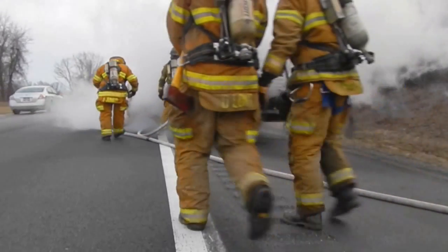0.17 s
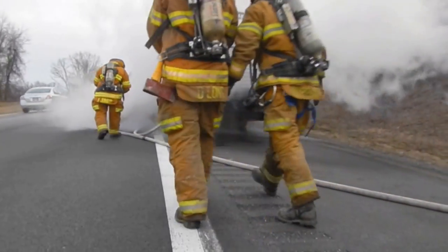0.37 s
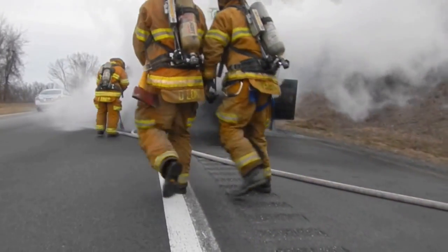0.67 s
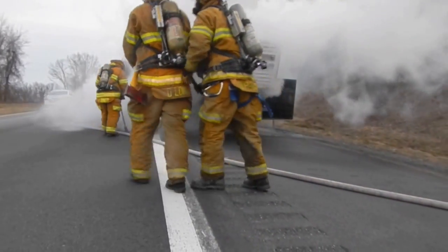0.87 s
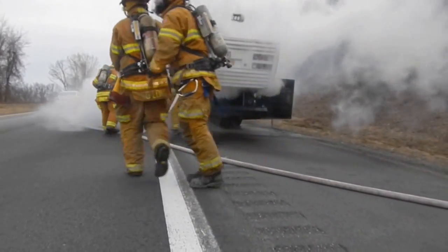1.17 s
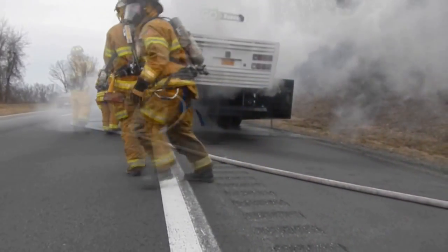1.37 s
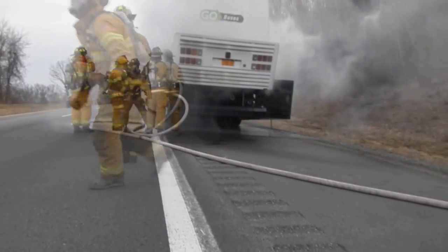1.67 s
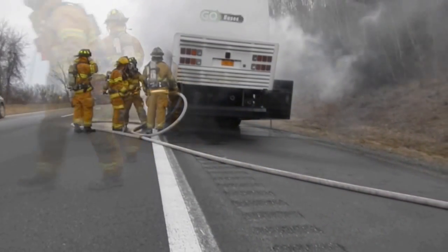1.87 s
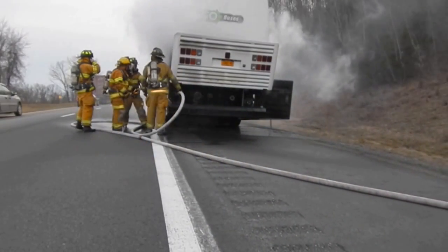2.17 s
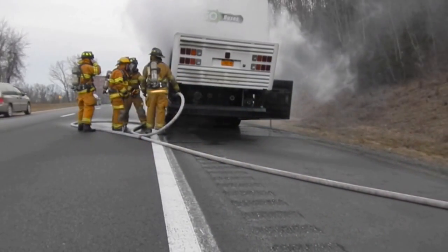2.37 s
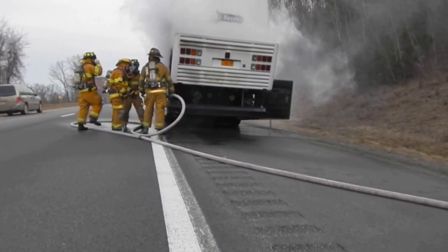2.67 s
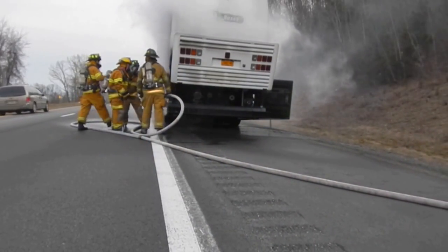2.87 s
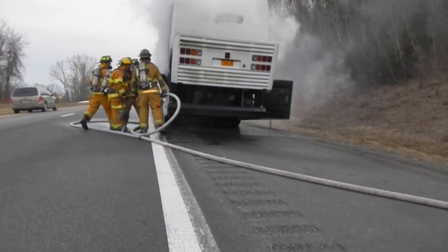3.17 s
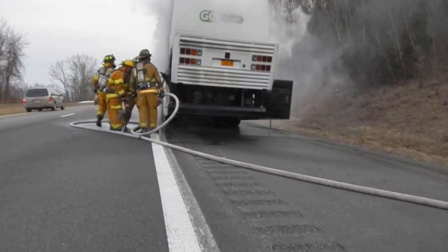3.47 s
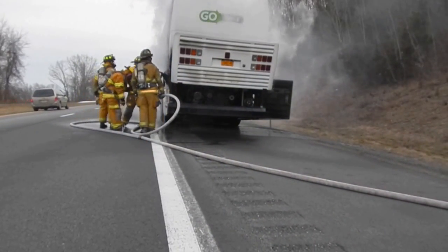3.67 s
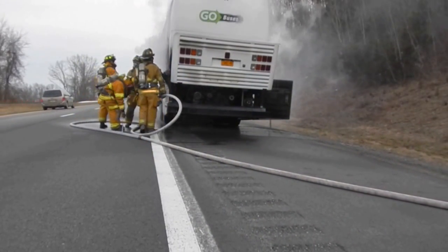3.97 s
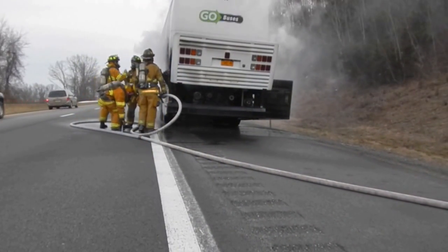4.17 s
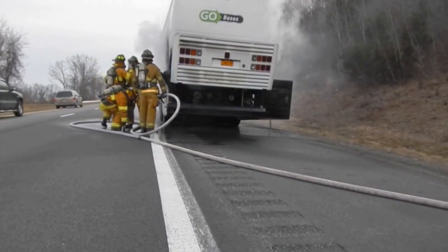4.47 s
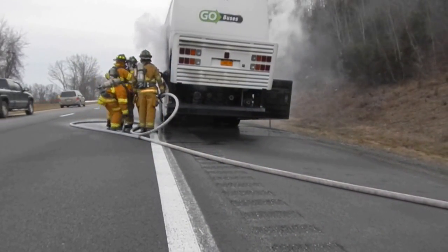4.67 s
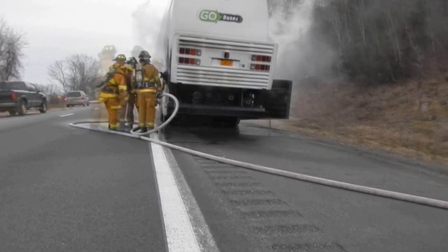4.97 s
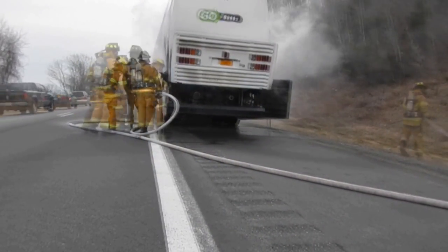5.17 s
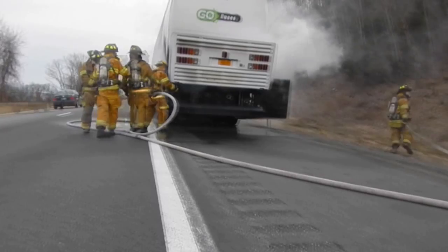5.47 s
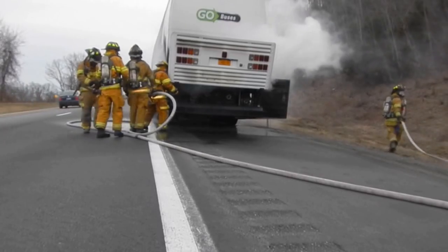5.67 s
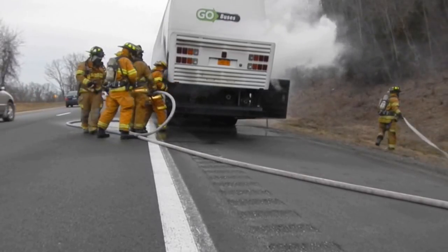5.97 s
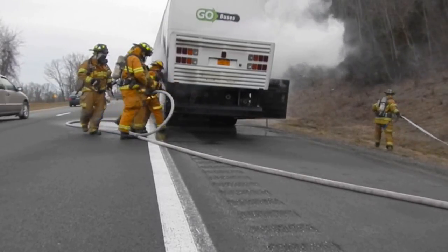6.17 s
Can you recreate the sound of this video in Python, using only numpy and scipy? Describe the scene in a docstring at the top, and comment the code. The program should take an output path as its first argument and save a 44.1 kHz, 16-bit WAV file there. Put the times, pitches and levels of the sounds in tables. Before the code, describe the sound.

Close, loud fire engine diesel running steadily, rattling knocks and whining pump gears, its level repeatedly dipping abruptly and creeping back.

```python
"""A big diesel drones at pumping speed on a roadside, close to a small stereo microphone.
Firing orders are sines locked to the shaft, over noise roar that partly repeats each engine cycle.
Knocks ring short modes, pump gears whine, a thin whistle sits on top, and a small metal tick rings once.
A boomy 300 Hz drone of resonant noise comes from the right. Two cross-fades join three moments.
The whole level drops in steps, each after a short surge, and creeps back up."""
import sys
import numpy as np
from scipy import signal
from scipy.fft import rfft, irfft
from scipy.io import wavfile
from scipy.ndimage import uniform_filter1d, minimum_filter1d

SR = 44100
rng = np.random.default_rng(int(sys.argv[2]) if len(sys.argv) > 2 else 0)


def invert_db(x):
    """Field ratio 10**(x/20) for x, a level in decibels (scalar or array-like)."""
    u = np.asarray(x, float) / 20
    return 10 ** u


def master_out(mix):
    """Clip the mix to full scale and print it as 16-bit PCM to the path in sys.argv[1]."""
    frames = np.transpose(np.atleast_2d(mix))
    ceiling = np.clip(frames, -1, 1)
    pcm = np.round(ceiling * 32767).astype(np.int16)
    wavfile.write(sys.argv[1], SR, pcm)


N = 278271
T = np.arange(N) / SR
HZ = np.fft.rfftfreq(N, 1 / SR)

# engine speed as the pitch of the pump gears, with the base level of their whine:
# (time [s], pitch [Hz], level [dB])
GEAR_WHINE = [(0, 2092, -41), (.3, 2093.3, -39.5), (.9, 2093, -36), (1.3, 2092, -39.5), (1.6, 2090.5, -35),
              (1.9, 2086.5, -35.5), (2.35, 2088, -36), (2.75, 2085.3, -41), (3.0, 2086.2, -35),
              (3.3, 2085, -38), (3.8, 2090, -34), (4.3, 2087.6, -37), (4.85, 2086.4, -36.5),
              (5.2, 2088.7, -37), (5.7, 2089.5, -42), (6.31, 2086.5, -42.5)]
# the three moments: (fade-in start [s], level [dB], whistle pitch at that start [Hz], whistle glide [Hz/s])
MOMENT_ROWS = [(-1, .8, 6690, -17), (1.47, 0, 6568, -1), (5.1, -.3, 6572, -8)]
GEAR_PER_TURN = 63.47  # gear contacts per shaft turn
CYCLE = 2680  # samples in one engine cycle of two shaft turns, as the noise repeats


def curve(table, k):
    """Column k of a table over time."""
    rows = np.array(table, float)
    return np.interp(T, rows[:, 0], rows[:, k])


def spectrum(table, k):
    """Column k of a table over log frequency."""
    rows = np.array(table, float)
    return np.interp(np.log(HZ + 1), np.log(rows[:, 0]), rows[:, k])


def bump(hz, width):
    """Steep resonance shape: 1 at the centre, a quarter at half the width to either side."""
    return 1 / (1 + (2 * (HZ - hz) / width) ** 2) ** 2


def walk(rate):
    """Random levels held 1 / rate s and slewed twice; spread near 1."""
    k = int(SR / rate)
    held = np.repeat(rng.standard_normal(N // k + 1), k)
    return 1.34 * uniform_filter1d(uniform_filter1d(held, k), k)[:N]


def cyclic(repeat, throb_db):
    """Noise of which a share returns one engine cycle later, throbbing with the four firings of a cycle."""
    repeat = np.clip(repeat, 0, .95)
    cycles = rng.standard_normal((N // CYCLE + 9, CYCLE))
    # filtering down the rows feeds each cycle into the next
    noise = signal.lfilter([np.sqrt(1 - repeat ** 2)], [1, -repeat], cycles, axis=0).ravel()[-N:]
    phase = 2 * np.pi * np.arange(N) / CYCLE
    return noise * invert_db(throb_db * np.cos(4 * phase))


def tone(phase, db, waver_db, waver_rad, rate):
    """A sine that wavers in level and phase, as analytic signal; db is rms."""
    level = np.sqrt(2) * invert_db(db + waver_db * walk(rate))
    return level * np.exp(1j * (phase + waver_rad * walk(rate)))


def fades():
    """Share of each moment over time; the shares add up to 1."""
    fade_s = .51
    come = np.array([np.clip((T - row[0]) / fade_s, 0, 1) for row in MOMENT_ROWS])
    return come - np.vstack([come[1:], np.zeros(N)])


def shaft():
    """Shaft turns since the start, summed from the gear pitch."""
    return np.cumsum(curve(GEAR_WHINE, 1)) / GEAR_PER_TURN / SR


def joined(multiple):
    """Gain of a tone locked to the shaft: in a cross-fade its two phases add or cancel."""
    # shaft angle of each moment: (lead [turns])
    lead_turns = [0, -.021, .257]
    return sum(share * np.exp(2j * np.pi * multiple * turns) for share, turns in zip(fades(), lead_turns))


def orders():
    """Firing tones locked to the shaft; each has its own place between the ports."""
    # steady tones: (multiple of shaft speed, left level [dB], right level [dB], left phase lead [rad])
    order_rows = [(2, -29.7, -30.7, -.1), (3.004, -34, -32, .3), (3.996, -22.7, -24.2, .4),
                  (4.998, -22.8, -23.3, 0), (6.014, -29.5, -33, 1), (8, -45, -31, 1.5),
                  (9.5, -42, -30, 1.6), (13, -24.5, -25, 0), (14.02, -34, -32.5, .1), (19.97, -44, -45, 0),
                  (23, -44, -46, .2), (24.97, -41, -41.5, .1)]
    turn = 2 * np.pi * (shaft() + rng.random())
    out = 0
    for multiple, left_db, right_db, lead in order_rows:
        k = np.round(2 * multiple) / 2  # whole and half orders only
        # the pipe smears each pulse, so the orders do not peak together
        smeared = k * turn - 1.3 * k ** 2
        z = joined(k) * tone(smeared, .5 * walk(2), .4, .015 * k, 6)
        out = out + np.array([invert_db(left_db) * (z * np.exp(1j * lead)).real, invert_db(right_db) * z.real])
    return out


def roar():
    """Exhaust and fan roar: the bass repeats a little each cycle, the treble less; mid and high flicker."""
    # left port before the body lifts it: (frequency [Hz], density [dB per Hz])
    roar_curve = [(30, -70), (55, -52.5), (110, -47), (180, -43.5), (300, -47), (430, -44.5), (500, -48),
                  (700, -56.5), (900, -52), (1300, -59.5), (2400, -65), (4500, -75), (8000, -86.5),
                  (15500, -98.5)]
    # stereo image: (frequency [Hz], right minus left [dB], likeness [0-1])
    stereo = [(40, -1.3, .95), (200, -1.5, .9), (300, 0, .4), (450, 0.5, 0.83), (600, 0.5, .7),
              (1100, 1, 0.72), (1800, -3, .88), (3600, -4.5, 0.39), (5500, -4, .1), (7200, -2, .35),
              (9000, -1, .42), (11500, 1.5, .1), (15000, 3.5, 0)]
    # body resonances that lift or dent the roar: (frequency [Hz], width [Hz], lift [dB])
    body = [(115, 16, -6), (174.4, 40, 2), (228, 24, -1.5), (429, 60, 3.5), (784, 69, 3), (995, 73, 3),
            (1445, 103, 4), (2090, 170, 1), (3550, 500, .3), (4200, 500, -1), (9400, 1800, 2),
            (11150, 1000, 7.5), (12150, 900, 5)]
    lag_s = 4.6e-5  # the shared sound reaches the left port first
    bass_share = 1 / (1 + (HZ / 900.) ** 2)

    def gas():
        bass = np.sqrt(bass_share) * rfft(cyclic(.15, .3))
        return bass + np.sqrt(1 - bass_share) * rfft(cyclic(.046, .15))

    shared, left, right = gas(), gas(), gas()
    like = np.clip(spectrum(stereo, 2), 0, 1)
    early = np.exp(2j * np.pi * HZ * lag_s)
    left = np.sqrt(like) * shared * early + np.sqrt(1 - like) * left
    right = (np.sqrt(like) * shared + np.sqrt(1 - like) * right) * invert_db(spectrum(stereo, 1))
    lift_db = sum(db * bump(hz, width) for hz, width, db in body)
    pair = np.array([left, right]) * np.sqrt(SR / 2) * invert_db(spectrum(roar_curve, 1) + lift_db)
    low = irfft(pair * (HZ < 600), N)
    mid = irfft(pair * ((HZ >= 600) & (HZ < 3000)), N)
    high = irfft(pair * (HZ >= 3000), N)
    gust = walk(30)  # common to mid and high
    return low + mid * invert_db(.9 * walk(8) + .4 * gust) + high * invert_db(.64 * walk(10) + .55 * gust)


def knocks():
    """One sharp knock at each firing, uneven in size and a little in time, ringing the block."""
    # block modes: (frequency [Hz], ring to -60 dB [s], left level [dB], right level [dB])
    modes = [(950, .02, -27.5, -27.5), (1500, .015, -32, -34), (3000, .010, -38, -44),
             (3560, .011, -28, -35), (4300, .008, -44, -48), (5600, .006, -51, -52)]
    firing = np.floor(2 * shaft())
    at = np.flatnonzero(np.diff(firing))
    chance = rng.standard_normal((len(at), 1 + len(modes)))
    at = np.clip(at + (.0004 * SR * chance[:, 0]).astype(int), 0, N - 1)  # timing spread 0.4 ms
    t = np.arange(2048) / SR
    push = np.sin(np.pi / 2 * np.minimum(t / .0008, 1)) ** 2  # pressure builds over 0.8 ms
    out = 0
    for k, (hz, t60, left_db, right_db) in enumerate(modes):
        blows = np.zeros(N)
        # every mode is struck with its own strength and sign
        blows[at] = .9 + .55 * chance[:, k + 1]
        mode = np.sin(2 * np.pi * hz * t) * np.exp(-np.log(1000) * t / t60) * push
        ring = signal.fftconvolve(blows, mode)[:N]
        out = out + np.array([invert_db(left_db) * ring, invert_db(right_db) * np.roll(ring, 2)])
    return out


def pump():
    """Gear whine that throbs with the firings, louder on the left, and weaker smeared tones."""
    # pump and panel tones: (frequency [Hz], level [dB])
    panel_tones = [(900, -37.5), (1426, -45), (1491, -47.5)]
    throb_db = 1.5 * np.cos(4 * np.pi * shaft())
    phase = 2 * np.pi * GEAR_PER_TURN * shaft()
    whine = joined(GEAR_PER_TURN) * tone(phase, curve(GEAR_WHINE, 2) + throb_db, 1.2, .3, 30)
    tones = sum(tone(2 * np.pi * hz * T, db, 2.5, 1.1, 10) for hz, db in panel_tones).real
    left = invert_db(.1) * whine.real + tones
    right = invert_db(-2.9) * (whine * np.exp(-.25j)).real + tones
    return np.array([left, right])


def whistle():
    """A high thin line with weaker lines at 5/3 and twice its pitch, gliding anew in each moment."""
    out = 0
    for share, (start, _, hz, glide) in zip(fades(), MOMENT_ROWS):
        phase = 2 * np.pi * np.cumsum(hz + glide * (T - start)) / SR + 1.1 * walk(25)
        line = tone(phase, -59.5, 1.8, 0, 10)
        upper = tone(phase * 5 / 3, -72, 2.5, 0, 10)
        octave = tone(2 * phase, -68, 2.5, 0, 10)
        out = out + share * (line + upper + octave)
    return np.array([out.real, invert_db(-2) * (out * np.exp(.8j)).real])


def drone():
    """A hollow boom off to the right, partly repeating each cycle; little of it reaches the left port."""
    # resonances: (frequency [Hz], width [Hz], peak density at the right port [dB per Hz])
    boom_rows = [(245, 25, -39), (275, 45.5, -34.5), (313, 40, -34.5), (362, 55, -38), (540, 64, -54),
                 (1080, 110, -55.5)]
    power = sum(invert_db(2 * db) * bump(hz, width) for hz, width, db in boom_rows)
    boom = irfft(rfft(cyclic(.3, 1.2)) * np.sqrt(power * SR / 2), N)
    return np.array([invert_db(-26) * np.roll(boom, -30), boom])  # left runs 30 samples ahead


def tick():
    """One small metal tick: a short bright decaying sine, equal in both ports."""
    start_s, hz, t60_s, db = .024, 5800, .015, -33
    t = np.maximum(T - start_s, 0)
    return invert_db(db) * np.sin(2 * np.pi * hz * t) * np.exp(-np.log(1000) * t / t60_s)


def stepping_level():
    """Level in dB over time: it surges briefly, drops at once and creeps back, again and again."""
    # (time [s], drop [dB])
    drops = [(0, 2.9), (0.047, 3.2), (0.294, 1.5), (0.474, 2.8), (0.629, 1.2), (0.751, 2.1), (0.945, 4.9),
             (1.13, 4.7), (1.442, 2.8), (1.581, 2.8), (1.739, 4.4), (1.978, 4.0), (2.13, 1.4), (2.347, 6.3),
             (2.744, 2.5), (2.981, 5.6), (3.24, 2.0), (3.515, 1.4), (3.799, 3.2), (3.983, 3.6), (4.2, 2.0),
             (4.44, 4.0), (4.809, 0.9), (4.989, 1.7), (5.078, 3.0), (5.188, 2.3), (5.33, 1.0), (5.485, 4.1),
             (5.712, 1.8), (5.804, 4.0), (6.168, 1.3)]
    ceiling_db, drop_s, recover_s = 4.2, .0042, .3
    surge_share, surge_s = .3, .03  # surge ahead of each drop, as a share of the drop
    level_db = ceiling_db + np.array(MOMENT_ROWS)[:, 1] @ fades()
    for s, db in drops:
        dropped = np.clip((T - s) / drop_s, 0, 1)
        surge = surge_share * (1 - dropped) * np.exp(np.minimum(T - s, 0) / surge_s)
        dip = dropped * np.exp(-np.maximum(T - s, 0) / recover_s)
        level_db = level_db + db * (surge - dip)
    return level_db


def scene():
    """All sources under one stepping level; unrelated noises thin out in a cross-fade."""
    thinning = np.sqrt(np.sum(fades() ** 2, axis=0))
    noise = (roar() + knocks() + drone()) * thinning
    return (noise + orders() + pump() + whistle() + tick()) * invert_db(stepping_level())


def roll_off(x):
    """The treble ends steeply here."""
    return signal.sosfilt(signal.butter(12, 15710, fs=SR, output="sos"), x)


def record(dry):
    """A quick limiter ducks both channels together around the loudest peaks."""
    need = np.minimum(1, .97 / np.maximum(np.abs(dry).max(axis=0), 1e-9))
    gain = uniform_filter1d(minimum_filter1d(need, size=441), size=331)  # 10 ms hold, 7.5 ms slope
    return roll_off(dry * gain)


dry = scene()
out = record(dry)
master_out(out)
```